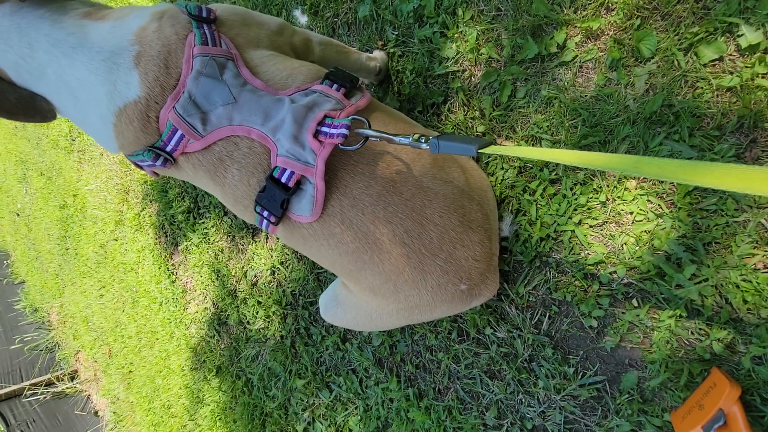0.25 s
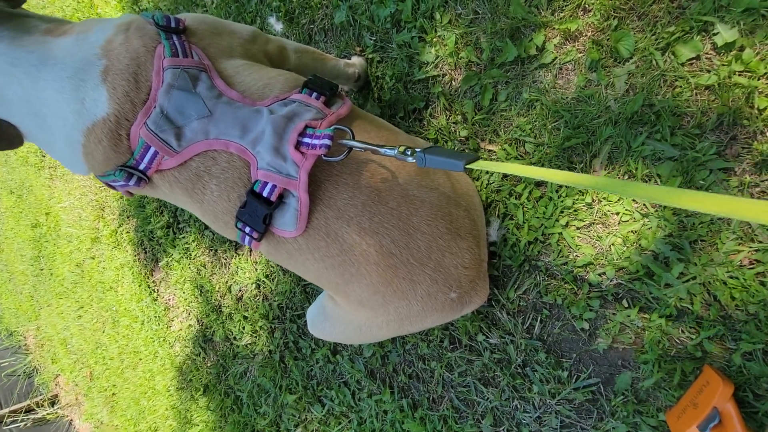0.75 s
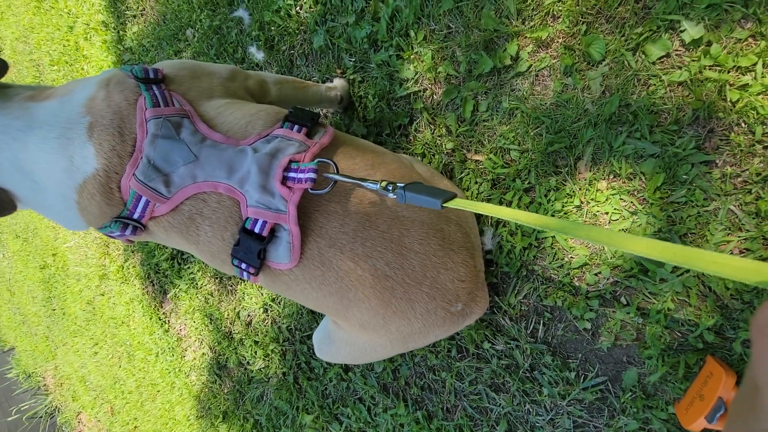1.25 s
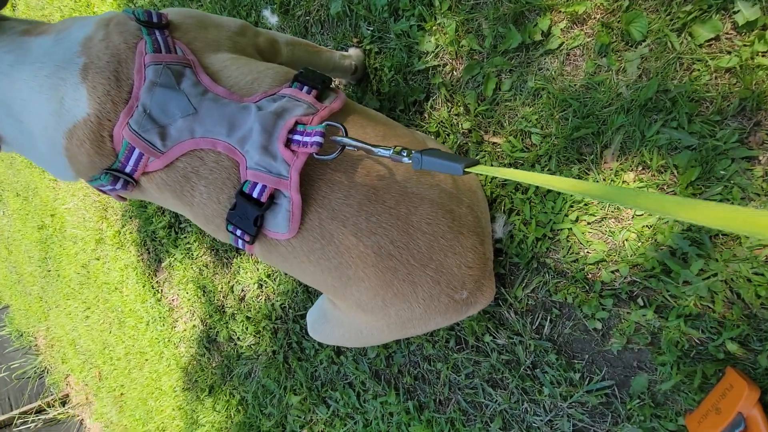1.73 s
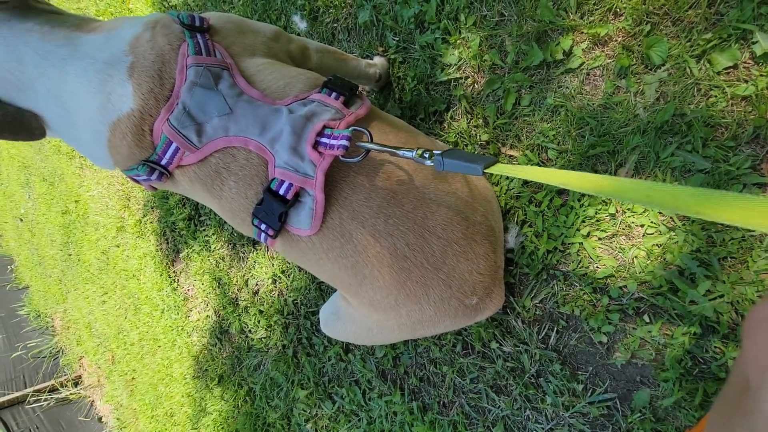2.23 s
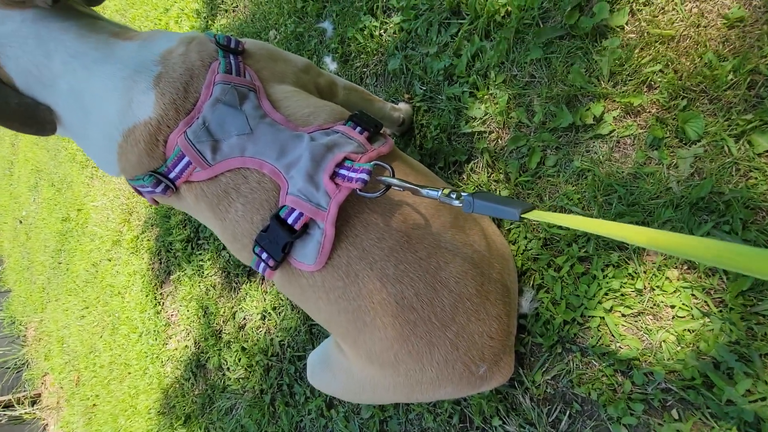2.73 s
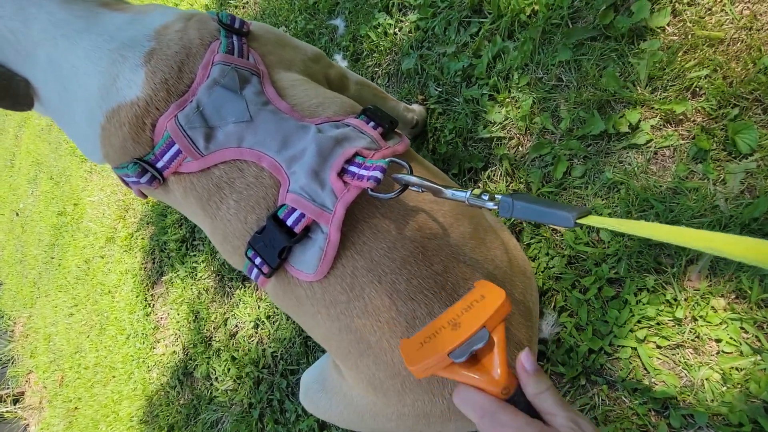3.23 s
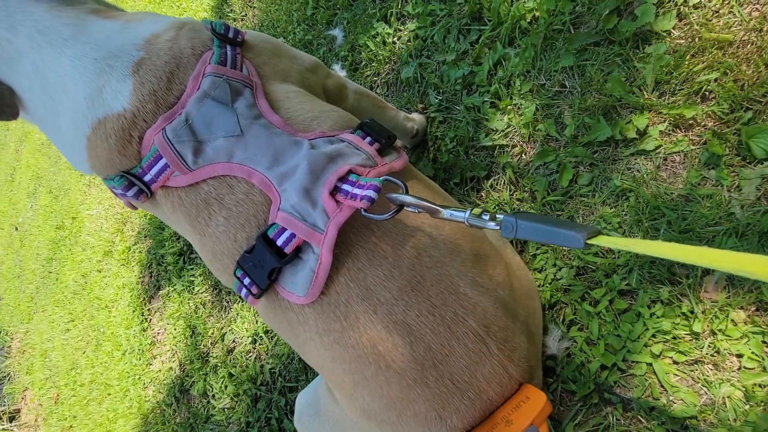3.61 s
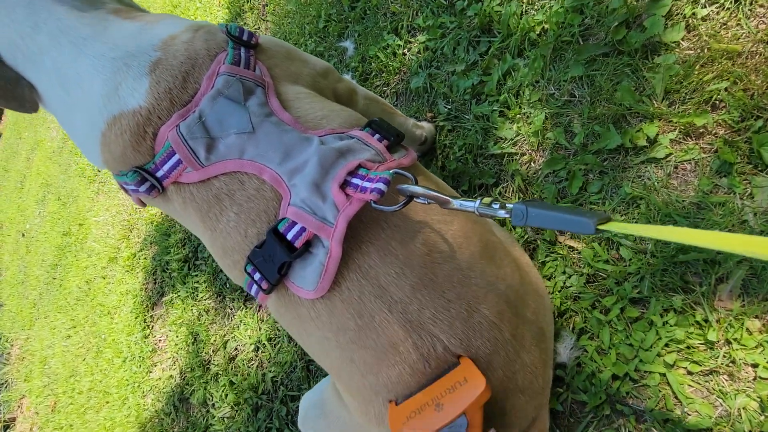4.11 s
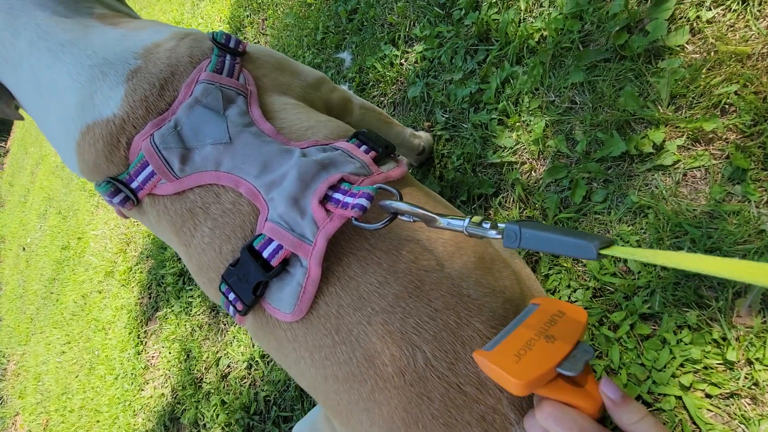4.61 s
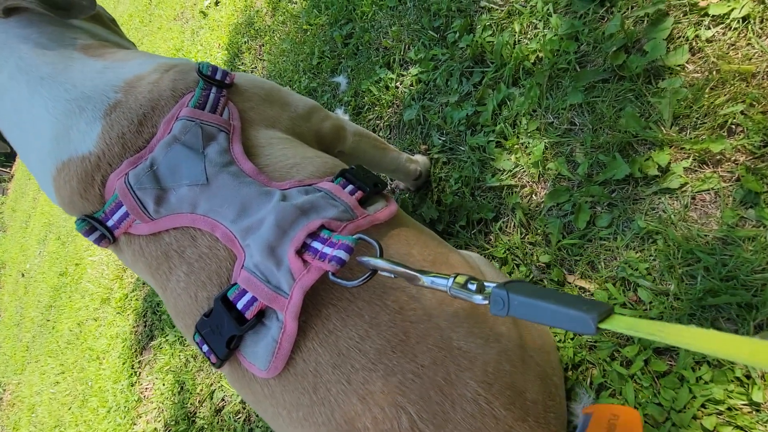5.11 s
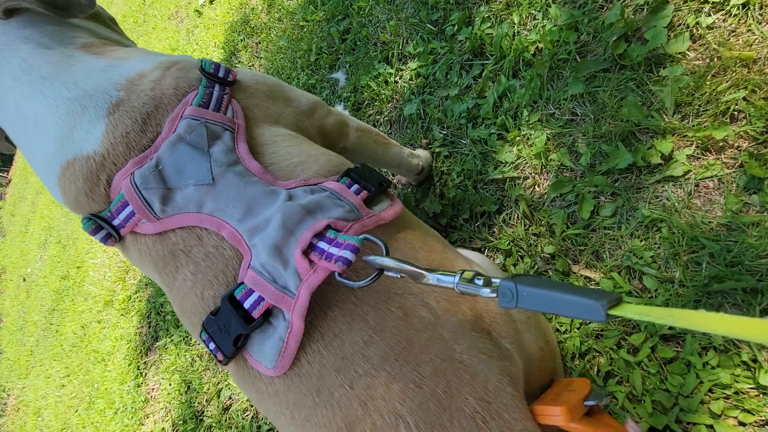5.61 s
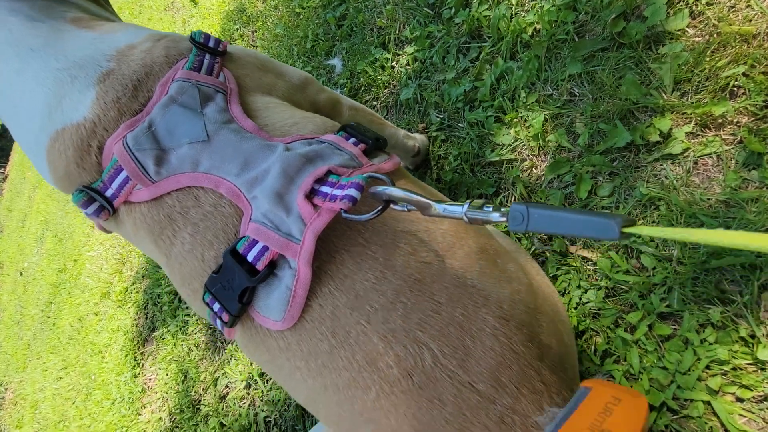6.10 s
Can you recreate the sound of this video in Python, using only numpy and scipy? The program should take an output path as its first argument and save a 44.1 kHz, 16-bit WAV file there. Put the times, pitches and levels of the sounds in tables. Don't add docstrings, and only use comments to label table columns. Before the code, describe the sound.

Close handling rustles, dry ticks and a hard knock, then four raspy brush strokes through short dog hair over distant traffic and birds.

```python
import sys
import numpy as np
from scipy import signal
from scipy.fft import rfft, irfft
from scipy.io import wavfile
from scipy.ndimage import uniform_filter1d

SR = 44100
rng = np.random.default_rng(int(sys.argv[2]) if len(sys.argv) > 2 else 0)


def invert_db(level):
    return 10 ** (np.asarray(level, dtype=float) / 20)


def unload_audio(sound):
    columns = np.transpose(np.atleast_2d(sound))
    steps = np.round(np.clip(columns, -1, 1) * 32767)
    wavfile.write(sys.argv[1], SR, steps.astype(np.int16))


N = 280035
TIME = np.arange(N) / SR


def evened(x):
    return x / np.sqrt(np.mean(x ** 2) + 1e-20)


def read(points, hz):
    f, value = np.transpose(points)
    return np.interp(np.log(hz + 1), np.log(f + 1), value)


def over_time(points):
    return np.interp(TIME, *np.transpose(points))


def add(mix, s, sound):
    part = mix[:, max(round(s * SR), 0):][:, :sound.shape[-1]]
    part += sound[:, :part.shape[1]]


def panned(x, pan_db):
    return np.array([invert_db(pan_db / 2), invert_db(-pan_db / 2)]).reshape(2, -1) * x


def colour(x, points):
    gain = invert_db(read(points, np.fft.rfftfreq(x.shape[-1], 1 / SR)))
    return evened(irfft(rfft(x) * gain, x.shape[-1]))


def resonate(x, hz, width):
    turn = np.exp(2j * np.pi * np.cumsum(hz * np.ones(x.shape[-1])) / SR)
    r = np.exp(-np.pi * abs(width) / SR)
    smooth = signal.lfilter([1], [1, -2 * r, r ** 2], x * turn.conj())
    return evened((turn * smooth).real)


def clumps(shape, size):
    smooth = uniform_filter1d(rng.standard_normal(shape), size)
    return evened(uniform_filter1d(smooth, size))


# f/Hz, likeness (1 = same, -1 = opposite)
SAME = [(60, 1), (150, 0.97), (380, 0.75), (950, -0.038), (2380, -0.26), (5980, -0.35), (15000, -1.06)]
# f/Hz, left-right level/dB
LEAN = [(60, -0.5), (130, -2), (290, -6), (640, -2.5), (1410, -3), (3100, -0.5), (6820, -0.5), (15000, 0)]


def wash(points, patchy_db):
    frames, hz = N // 512 + 5, np.fft.rfftfreq(2048, 1 / SR)
    a, b, c, d, patches = rng.standard_normal((frames, 1025, 5)).T
    patches = uniform_filter1d(patches, size=16, axis=0)
    patches = evened(uniform_filter1d(patches, size=6, axis=1))
    same = np.clip(read(SAME, hz), -1, 1)[:, None]
    left = a + 1j * b
    right = same * left + np.sqrt(1 - same ** 2) * (c + 1j * d)
    z = np.array([left, right]) * invert_db(read(points, hz)[:, None] + patchy_db * patches)
    z *= panned(1, read(LEAN, hz))[:, :, None]
    return evened(signal.istft(z, nperseg=2048, noverlap=1536)[1][:, :N])


# t/s, level/dB
ROAD = [(0, -3.5), (.45, 0.5), (.9, -2.5), (1.9, -2.5), (2.45, 1.2), (3.4, 1), (4.0, 1.5), (5.05, 2),
        (5.5, 2.5), (6.1, 4), (6.35, 5)]
# f/Hz, level/dB per Hz
DEEP = [(20, -12), (38, -27), (55, 3.5), (113, -1), (139, 2.5), (161, -1), (214, -8), (300, -24.5),
        (400, -54)]


def rumble():
    return invert_db(-46.5 + 0.045 * over_time(ROAD)) * wash(DEEP, patchy_db=-2.0)


# f/Hz, level/dB per Hz
WIND = [(15, -29), (30, 20.5), (45, 21), (75, 23.5), (110, -42.5)]
# t/s, level/dB
GUST = [(0, -57), (.6, -52), (.95, -52), (1.05, -40), (1.2, -41.5), (1.4, -54), (1.62, -43), (1.72, -53),
        (1.85, -46), (2.0, -43.5), (2.7, -65), (4.9, -56.5), (6.35, -65)]


def wind():
    return panned(invert_db(over_time(GUST)) * colour(rng.standard_normal(N), WIND), 6.3)


# f/Hz, level/dB per Hz
LORRY = [(130, -30), (170, 0), (230, 0), (310, -5), (400, -30)]


def lorry():
    pass_db = np.interp(TIME, [5.0, 5.3, 6.0, 6.35], [-30, -3, 1, -17])
    return invert_db(-50 + pass_db) * wash(LORRY, patchy_db=4.5)


# f/Hz, level/dB
ROAR = [(150, 10), (220, 11.5), (300, 14.5), (400, 6), (500, -7.5), (600, -44)]
# f/Hz, width/Hz, level/dB
HUM = [(54.8, 15, -55), (110, 10.7, -51.5), (217.6, 3.16, -59.5), (217.3, 8.8, -61)]
# f/Hz, level/dB per Hz
AIR = [(260, -8), (450, -1.5), (580, -5.5), (840, -5.5), (1320, -2.5), (1630, -8.5), (2260, -10.5),
       (3230, -10), (3700, -19), (4560, -18.5), (6900, -26.5), (8500, -28), (11000, -45), (15800, -55)]


def traffic():
    road_db = over_time(ROAD)
    roar = invert_db(-55.5 + road_db) * wash(ROAR, patchy_db=2.5)
    hums = sum(invert_db(db) * resonate(rng.standard_normal(N), hz, width) for hz, width, db in HUM)
    air = invert_db(-60.5 + 0.68 * road_db) * wash(AIR, patchy_db=1.5)
    return roar + panned(hums * invert_db(0.26 * road_db), -1.3) + air


# t/s, f/Hz, level/dB
ENGINE = [(1.699, 163.8, -56.5), (2.0, 158, -49.5), (2.16, 157, -42.5), (2.31, 155, -47.5),
          (2.45, 143, -46.5), (2.58, 144, -50.5), (2.76, 155.5, -43), (2.96, 145, -42.5),
          (3.13, 142, -54.5), (3.45, 148, -45.5), (3.85, 145.5, -50.5), (4.2, 146, -45.5),
          (4.36, 142, -46.5), (4.469, 138.6, -64), (4.7, 141, -49), (4.9, 139, -74)]


def engine():
    s, hz, db = np.transpose(ENGINE)
    drone = np.sqrt(2) * np.sin(2 * np.pi * np.cumsum(np.interp(TIME, s, hz)) / SR)
    return panned(drone * invert_db(np.interp(TIME, s, db, -90, -90)), -2.1)


# t/s, level/dB
FLOCK = [(0, -80), (1.4, -77), (2.2, -76), (2.5, -85), (2.7, -74), (3.1, -69), (3.4, -77), (4.5, -76),
         (5.5, -80), (6.35, -86)]


def flock():
    hz = 3100 * (1 + 0.055 * clumps(N, size=2500))
    twitter = resonate(rng.standard_normal((2, N)), hz, width=700)
    return invert_db(over_time(FLOCK)) * twitter * invert_db(1.9 * clumps(N, size=1500))


def note(s, length, start_hz, end_hz, db, width, bend):
    u = np.arange(round(length * SR)) / (length * SR)
    glide = end_hz + (start_hz - end_hz) * (1 - u) ** bend
    hz = np.pad(glide, (4000, 0), "edge")
    pure = np.sin(2 * np.pi * np.cumsum(hz) / SR)
    air = rng.standard_normal((2, len(u) + 4000)) + (0.13 + 2.9 / width) * pure
    tone = evened(resonate(air, hz, width)[:, 4000:]) * signal.windows.tukey(len(u), .3)
    scatter = rng.standard_normal((2, 9000)) * invert_db(-60 * np.arange(9000) / SR / .45)
    tail = signal.fftconvolve(tone, scatter / np.linalg.norm(scatter[0]), axes=1)
    return s, invert_db(db) * (np.pad(tone, ((0, 0), (0, 8999))) + invert_db(-2.0) * tail)


# t/s, length/s, start f/Hz, end f/Hz, level/dB
THIN = [(0, 0.13, 3750, 3700, -73), (.2, 0.052, 6850, 7220, -69), (.51, 0.073, 6400, 8150, -66),
        (.562, 0.032, 7660, 7850, -68), (1.71, 0.065, 7080, 7130, -72.5), (2.725, 0.038, 6960, 6500, -70.5),
        (6.31, 0.049, 6990, 7040, -70)]
TRILL = [
    (.925, 0.032, 4500, 5200, -64),
    (.95, 0.11, 5380, 5300, -74.5),
    (1.048, 0.034, 4740, 3730, -62.5),
    (1.095, 0.041, 3260, 2920, -61),
    (6.22, 0.15, 4200, 4350, -62),
]
WARBLER = [(.79, 0.039, 4350, 4300, -70), (.828, 0.022, 4200, 4150, -70), (.86, 0.06, 4100, 4420, -72),
           (1.83, 0.089, 4780, 5030, -76), (3.55, 0.037, 4450, 4200, -70), (4.9, 0.091, 4340, 4190, -67),
           (5.54, 0.057, 4240, 4200, -65.5), (5.75, .04, 4100, 4230, -65), (5.596, 0.02, 4030, 4240, -58),
           (5.962, 0.035, 4400, 4130, -59), (6.015, 0.095, 4250, 4380, -64.5),
           (6.24, 0.025, 4200, 4160, -65), (.95, 0.033, 5830, 5800, -70), (.955, .05, 5200, 5400, -77),
           (.99, 0.055, 6050, 6140, -77)]
CHIRPS = [(.86, 0.051, 2900, 2930, -75), (.95, 0.054, 3150, 3150, -74), (1.31, 0.026, 2650, 2600, -71),
          (1.478, 0.019, 3180, 3100, -65), (1.505, .03, 3280, 3290, -72), (1.56, 0.026, 3180, 3240, -75),
          (1.74, 0.049, 3120, 3100, -80), (1.88, 0.024, 3150, 3130, -69), (1.95, 0.022, 3500, 3400, -65),
          (1.96, 0.04, 3030, 3040, -65), (2.02, 0.067, 3050, 3080, -71), (2.14, 0.063, 3430, 3300, -69.5),
          (2.22, 0.058, 3200, 3000, -65.5), (2.59, 0.046, 3060, 2950, -77),
          (2.665, 0.065, 3060, 3040, -67.5), (2.7, 0.083, 3370, 3390, -75), (2.875, 0.014, 3200, 3000, -65),
          (2.94, 0.024, 3420, 3390, -67), (3.02, 0.077, 3110, 3040, -73), (3.1, 0.046, 2880, 3150, -67.5),
          (3.15, 0.092, 3380, 3420, -71.5), (3.33, 0.018, 3278, 3060, -66),
          (3.515, 0.046, 3220, 2990, -55.5), (5.642, 0.038, 3560, 2900, -56),
          (5.61, 0.019, 3600, 3480, -65), (5.8, .07, 3080, 2910, -72), (6.04, 0.016, 3134, 3206, -62),
          (6.3, 0.033, 3370, 3400, -64)]
WHISTLES = [
    (2.91, 0.078, 2690, 2225, -66),
    (3.003, .015, 2150, 2250, -66),
    (3.362, 0.0875, 2776, 2230, -66),
    (3.92, 0.04, 1795, 1790, -72),
]


def birds():
    mix = np.zeros((2, N))
    # song, breath width/Hz, left-right level/dB, bend
    for song, width, pan_db, bend in [(THIN, 280, 1.4, 2.1), (TRILL, 760, -2, 1), (WARBLER, 430, -2.4, 1.2),
                                      (CHIRPS, 230, -1.2, 1.37), (WHISTLES, 14, -13, 3.56)]:
        for row in song:
            s, sound = note(*row, width, bend)
            add(mix, s, panned(sound, pan_db))
    return mix


# approach/s, level at touch/dB, level at lift/dB, release/s
LIGHT = (0.018, -10, -5, 0.03)
FIRM = (0.02, -8, -4.5, 0.13)


def contact(touch, peak, lift, db, shape):
    approach, touch_db, lift_db, release = shape
    gone_db = -40.5
    s = np.maximum.accumulate([touch - approach, touch, peak, lift, lift + release])
    return invert_db(db + np.interp(TIME, s, [gone_db, touch_db, 0, lift_db, gone_db], -99, -99)) ** 2


def snaps(per_s, spread_db, same, clumpy_db):
    hit = rng.random((3, N)) < per_s / SR
    size = invert_db(spread_db * np.minimum(rng.exponential(1, (3, N)), 3))
    clicks = hit * size * rng.standard_normal((3, N)) * invert_db(clumpy_db * clumps(N, size=300))
    return np.sqrt(same) * clicks[2] + np.sqrt(1 - same) * clicks[:2]


def patchy(x, patchy_db):
    z = signal.stft(x, nperseg=256)[2]
    patches = evened(uniform_filter1d(clumps(z.shape[1:], size=9), size=4, axis=0))
    return evened(signal.istft(z * invert_db(patchy_db * patches), nperseg=256)[1][:, :N])


# f/Hz, level/dB
HISS = [(4500, -28), (6000, -0.5), (7500, 2.5), (9000, 2), (11000, 2), (13000, 5), (15000, 3), (15800, 6.5)]
# f/Hz, level/dB
RASP = [(1500, -6), (2300, 0), (3200, -4.5), (4500, -3), (5800, -8.5), (7000, -18), (9000, -18)]


def rub(power, idle_db, rasp_db, follows, pan_db):
    hiss_db = 10 * np.log10(power + invert_db(idle_db) ** 2)
    hiss = patchy(colour(snaps(30000, 0.7, 0.07, clumpy_db=1.0), HISS), patchy_db=2.5)
    rasp = patchy(colour(snaps(20000, 0.8, 0.17, clumpy_db=0.5), RASP), patchy_db=2.6)
    hiss *= invert_db(hiss_db + 2.5)
    rasp *= invert_db(rasp_db + follows * (hiss_db + 58.5) + 5.0)
    return panned(hiss, pan_db) + panned(rasp, 0.97 * pan_db - 4.0)


# touch t/s, peak t/s, lift t/s, hiss level/dB, left-right level/dB
RUSTLES = [(0.15, 0.22, 0.28, -70.5, -7), (0.392, 0.43, 0.44, -76, -7), (0.645, 0.72, 0.72, -60.5, -15),
           (0.757, 0.74, 0.94, -75.5, -5), (1.223, 1.3, 1.33, -71, -18), (1.342, 1.27, 1.52, -70, -3),
           (1.918, 1.93, 2.012, -52.5, -12.5), (2.163, 2.166, 2.22, -69, -15),
           (2.925, 2.94, 2.97, -71, -10), (1.588, 1.6, 1.62, -69, 0), (2.975, 2.995, 3.03, -68.5, -10),
           (.526, .56, .6, -69, -18), (1.645, 1.67, 1.84, -72, -1), (2.21, 2.24, 2.28, -72, -31),
           (2.32, 2.352, 2.4, -71, -17.5), (2.435, 2.53, 2.29, -68, -9), (2.55, 2.4, 3.1, -79, -2),
           (2.716, 2.8, 3.9, -85, -8), (5.295, 4.8, 5.4, -74, -14)]


def sleeve():
    idle_db, idle_pan_db = -91, -6.5
    powers = np.array([contact(*row[:4], LIGHT) for row in RUSTLES])
    power, idle = powers.sum(0), invert_db(idle_db) ** 2
    pan_db = (np.transpose(RUSTLES)[4] @ powers + idle_pan_db * idle) / (power + idle)
    return rub(power, idle_db, rasp_db=-73, follows=0.19, pan_db=0.89 * pan_db)


# f/Hz, level/dB
CRACK = [(700, 9), (2000, -43), (4000, 9.5), (9000, 3), (16000, -4)]


def tick(s, ring_db, hz, crack_db, pan_db, t60):
    t = np.arange(1500) / SR
    crack = colour(rng.standard_normal((2, 1500)), CRACK) * invert_db(crack_db - 5 - 60 * t / (1.2 * t60))
    late = np.maximum(t - np.array([[max(-pan_db, 0) * 2e-5], [0]]), 0)
    ring = np.sin(2 * np.pi * hz * late) * invert_db(ring_db - 60 * late / t60)
    ring *= np.minimum(late * hz / .7, 1)
    return s, panned(ring + crack, pan_db)


# t/s, ring level/dB, ring f/Hz, crack level/dB, left-right level/dB
NAILS = [(.2531, -42.5, 3500, -40, -14.5), (.36, -48, 6400, -62, -12.5), (.478, -53, 4900, -51, -13),
         (.49, -43, 1200, -70, -7), (.5592, -33.5, 2940, -40.5, -10.5), (.574, -60, 9000, -56, -8),
         (.583, -34.5, 3200, -40, -13.5), (.533, -60, 13500, -59, -12), (.599, -60, 8000, -43, -16),
         (2.994, -62, 14500, -52, -10), (.718, -48, 5550, -55, -7.5), (1.1952, -29.5, 1300, -29.5, -9.5),
         (2.465, -36, 2860, -48, -10), (2.4793, -41.5, 5570, -43, 4)]
BUCKLE = [(1.1895, -47, 1600, -40, 11), (1.1905, -36, 3110, -40, -3), (1.202, -48, 1140, -46, -2),
          (1.2128, -42, 1150, -70, -13), (1.2195, -47, 1050, -70, -5), (1.222, -50, 1510, -70, -5),
          (1.26, -47, 1170, -66, -18), (1.267, -44, 1200, -70, -7), (1.2775, -43.5, 1260, -50, -5),
          (1.245, -50, 1420, -70, -7), (1.276, -52, 3050, -70, -4), (2.4805, -24, 430, -53, -13),
          (2.4802, -30, 710, -55, -8), (2.4803, -30, 600, -62, -12)]


def hand_ticks():
    mix = np.zeros((2, N))
    for ticks, t60 in [(NAILS, 0.0037), (BUCKLE, 0.013)]:
        for row in ticks:
            add(mix, *tick(*row, t60))
    return mix


def knock(s, spike_db, push_db, thump_db, hz):
    t = np.arange(3000) / SR - .002
    spike = -np.exp(-abs((t - np.array([[.0001], [0]])) / .00013) ** 1.5)
    spike = spike - .17 * np.exp(-((t + .0007) / .0003) ** 2)
    push = -np.exp(-((t - np.array([[.0008], [.0019]])) / np.array([[.0004], [.0007]])) ** 2)
    late = np.maximum(t - np.array([[.0013], [.0028]]), 0)
    thump = np.sin(2 * np.pi * hz * late) * np.exp(-(late * hz / 1.0) ** 4.4)
    sound = invert_db([[-2.2], [-.1]]) * invert_db(spike_db) * spike
    sound = sound + invert_db([[-9.5], [-.1]]) * invert_db(push_db) * push
    sound = sound + invert_db([[-9.3], [-.1]]) * invert_db(thump_db) * thump
    return s - .002, sound


# t/s, spike level/dB, push level/dB, thump level/dB, thump f/Hz
KNOCKS = [
    (.604, -39, -23.5, -37, 110),
    (1.188, -37, -46, -34, 476),
    (1.2745, -45, -50, -34.5, 423),
    (2.465, -35.5, -64, -33, 100),
    (2.4799, -14.5, -16, -13.5, 81),
]


def knocks():
    mix = np.zeros((2, N))
    for row in KNOCKS:
        add(mix, *knock(*row))
    return mix


# t/s, ring level/dB, ring f/Hz, crack level/dB, left-right level/dB
TEETH = [(3.477, -53, 1900, -53, 0), (3.497, -52, 1890, -60, -5), (3.516, -46, 1820, -60, 0),
         (3.526, -45, 1820, -60, 2), (3.544, -44, 1300, -58, 1), (3.618, -43, 1540, -60, 3),
         (3.641, -41, 1400, -58, 4), (3.69, -55, 1186, -62, 4), (4.178, -41, 1420, -56, 7),
         (4.209, -40, 1180, -52, 3), (4.224, -41, 1280, -60, 9), (4.25, -42, 1310, -54, -5),
         (4.264, -41, 1280, -60, 0), (4.293, -53, 1340, -60, 0), (4.336, -47, 1900, -62, -7),
         (4.364, -47, 1710, -55, -4), (4.907, -43, 1480, -60, -1.5), (4.97, -43.5, 1700, -60, -6),
         (4.841, -42.5, 1400, -60, -6), (4.884, -42, 1430, -60, 1), (4.948, -45, 1700, -58, -8),
         (4.983, -40.5, 1700, -60, -7), (3.575, -44, 1290, -60, 0), (3.598, -42, 1520, -62, 0),
         (3.665, -46, 1500, -60, 0), (4.168, -40, 930, -60, -5), (4.1655, -42, 2170, -60, -2),
         (4.165, -45, 5300, -60, 0), (4.19, -45, 3100, -60, -2), (4.23, -41, 2020, -56, 0),
         (4.1493, -42, 1580, -50, -4), (4.1652, -50, 1456, -40, 4), (4.151, -57, 3950, -60, 0),
         (4.152, -55, 5000, -60, 0), (4.171, -37, 1410, -46, 9), (4.745, -72, 9100, -60, 0),
         (4.862, -40, 1710, -60, -12), (4.876, -39.5, 1600, -63, 4), (5.909, -59, 10300, -52, -6),
         (5.99, -47, 1680, -42.5, -4), (6.085, -56, 9050, -55, 11), (5.9905, -50, 11300, -60, -4),
         (5.9907, -48, 13000, -58, -5)]


def teeth():
    mix = np.zeros((2, N))
    for row in TEETH:
        add(mix, *tick(*row, t60=0.019))
    return mix


# f/Hz, width/Hz, level/dB, left-right level/dB
HEAD = [(896, 146, -2, -4), (1275, 390, -0.5, 2), (1567, 410, 0, 0.5), (1830, 430, -1, -5.5),
        (2410, 520, -3.5, -4), (3100, 540, -7, 19)]
# t/s, f/Hz
TILT = [(3.47, 1790), (3.54, 1770), (3.57, 1400), (3.62, 1530), (3.66, 1360), (3.7, 1210), (4.15, 1820),
        (4.18, 1460), (4.21, 1240), (4.31, 1320), (4.33, 1960), (4.38, 1833), (4.83, 1377), (4.87, 1590),
        (5.0, 1580), (5.5, 1810), (5.95, 1590)]
# f/Hz, level/dB
SMALL = [(500, -25), (700, -8), (820, 0)]


def head_ring(power):
    tilt_hz = over_time(TILT)
    catches = snaps(9000, 1.2, .5, clumpy_db=.5)
    belly_db = np.clip(10 * np.log10(power) + 48.5, -8, 2)
    head = np.zeros((2, N))
    for hz, width, db, pan_db in HEAD:
        off_db = np.minimum(12 * abs(np.log2(hz / tilt_hz)), 7.5)
        ring = resonate(catches, hz * (1 + .05 * clumps(N, size=1500)), width)
        ring *= invert_db(belly_db * (hz < 1000) - off_db)
        head += invert_db(db + .6 * clumps(N, size=300)) * panned(ring, pan_db)
    return colour(head, SMALL) * np.sqrt(power)


# touch t/s, peak t/s, lift t/s, hiss level/dB
GRAZES = [(3.392, 3.443, 3.5, -68), (3.86, 3.92, 3.99, -63), (4.1, 4.143, 4.43, -69.5),
          (4.53, 4.58, 4.605, -70), (4.744, 4.748, 4.85, -71), (4.787, 4.798, 5.06, -65),
          (5.456, 5.507, 5.54, -72), (5.885, 5.908, 5.93, -59), (5.965, 5.99, 5.996, -59),
          (6.0, 6.03, 6.05, -72), (6.065, 6.086, 6.105, -60), (6.12, 6.125, 6.135, -72),
          (6.242, 6.247, 6.26, -73), (6.3, 6.35, 6.7, -57)]
# touch t/s, peak t/s, lift t/s, hair hiss level/dB, head ring level/dB
STROKES = [
    (3.468, 3.51, 3.69, -52.5, -51.5),
    (4.147, 4.18, 4.35, -50, -48),
    (4.826, 4.89, 4.985, -53, -55),
    (5.525, 5.758, 5.9, -55.5, -59),
]


def brush():
    grazes = sum(contact(*row, LIGHT) for row in GRAZES)
    strokes = sum(contact(*row[:4], FIRM) for row in STROKES)
    bites = np.zeros(N)
    for touch, _, lift, _, ring_db in STROKES:
        shape = (FIRM[0], -4, -15 * (lift - touch), .09)
        bites += contact(touch, touch + .02, lift, ring_db, shape)
    held_db = -66.5
    head = head_ring(bites + invert_db(-1.5) ** 2 * grazes + invert_db(held_db) ** 2)
    hair = rub(grazes + strokes, idle_db=-81, rasp_db=-63.5, follows=0.57, pan_db=-0.4)
    raised = np.clip((TIME - 3.36) / 0.14, 0, 1)
    return raised * (head + hair)


def scene():
    mix = rumble() + wind() + lorry() + traffic() + engine()
    mix += sleeve() + brush()
    mix += flock() + birds()
    return mix + hand_ticks() + teeth() + knocks()


def low_pass(x):
    return signal.sosfilt(signal.butter(12, 16650, fs=SR, output="sos"), x)


def record(dry):
    in_band = np.fft.rfftfreq(N, 1 / SR) < 15840
    limited = irfft(rfft(dry) * in_band, N)
    return low_pass(limited)


dry = scene()
out = record(dry)
unload_audio(out)
```